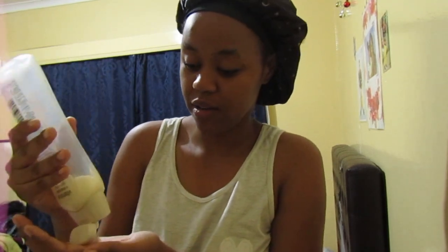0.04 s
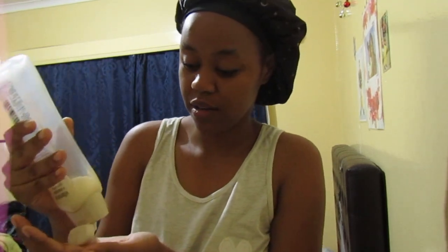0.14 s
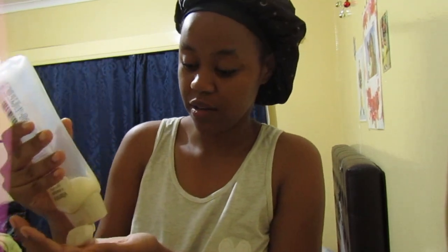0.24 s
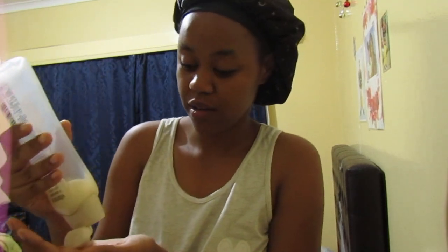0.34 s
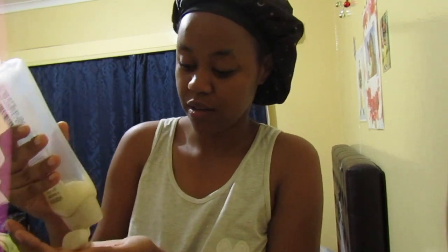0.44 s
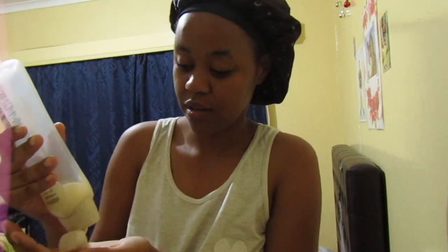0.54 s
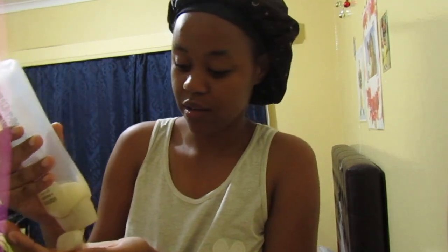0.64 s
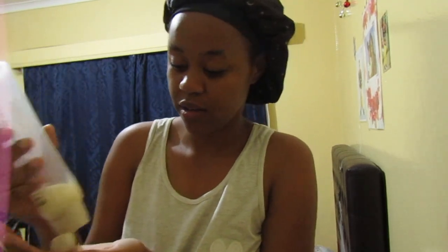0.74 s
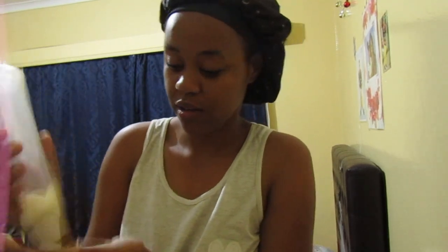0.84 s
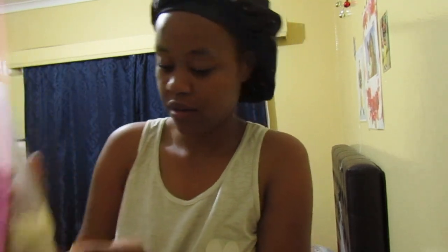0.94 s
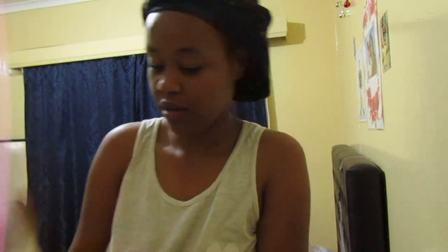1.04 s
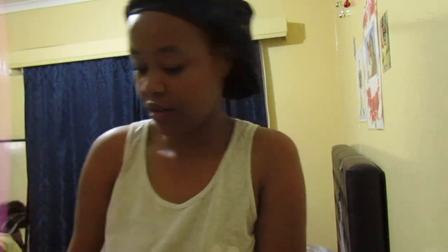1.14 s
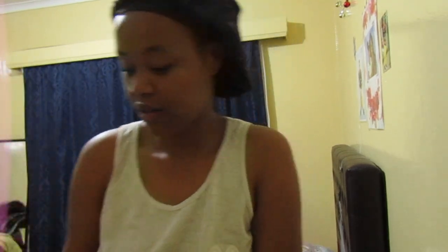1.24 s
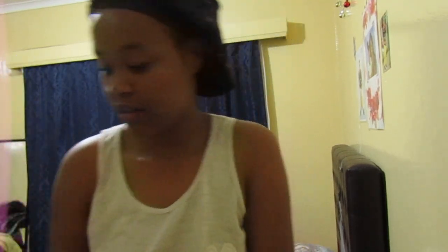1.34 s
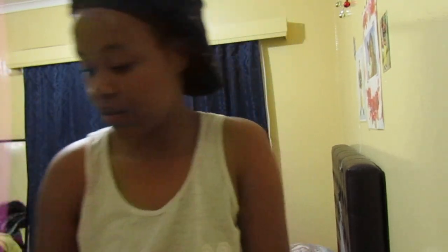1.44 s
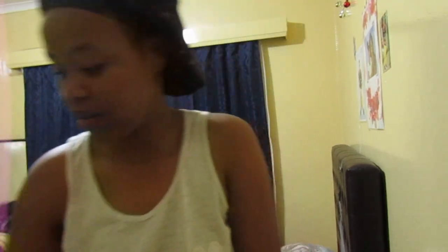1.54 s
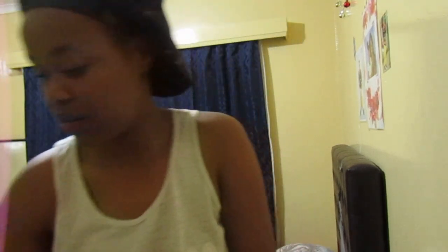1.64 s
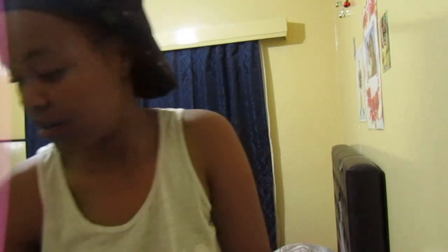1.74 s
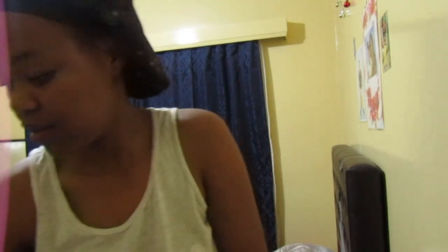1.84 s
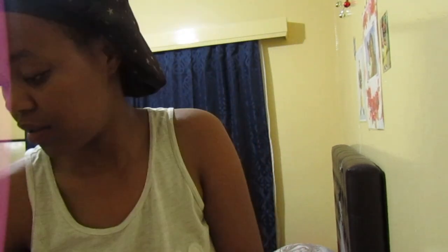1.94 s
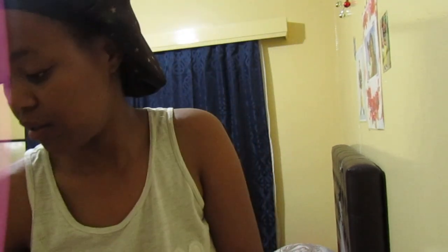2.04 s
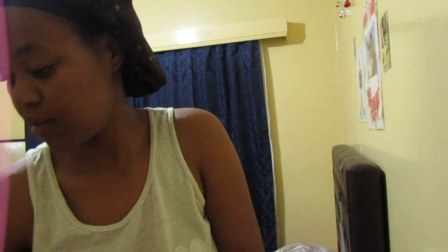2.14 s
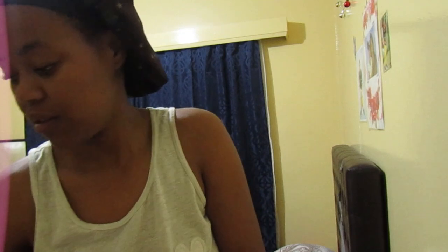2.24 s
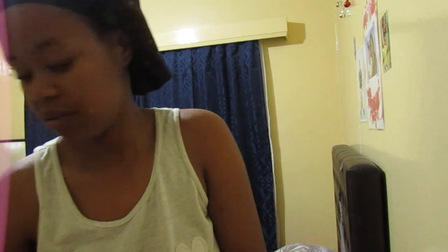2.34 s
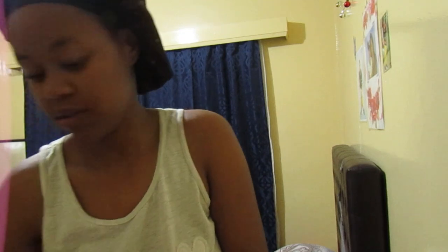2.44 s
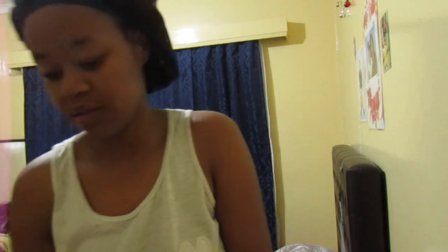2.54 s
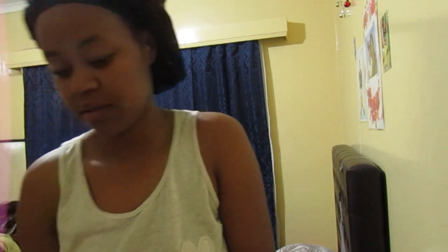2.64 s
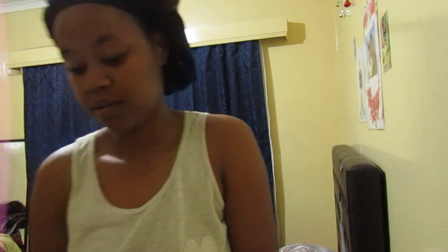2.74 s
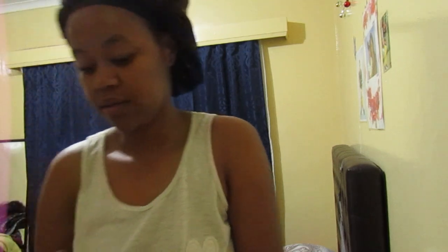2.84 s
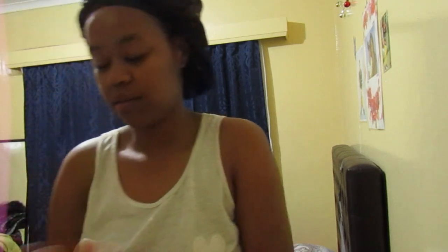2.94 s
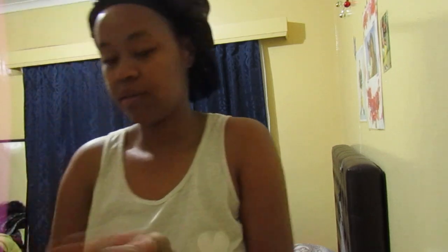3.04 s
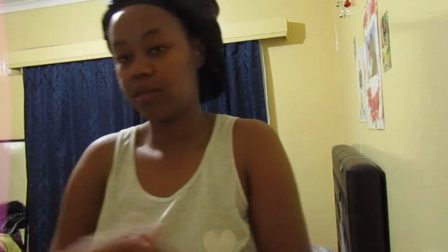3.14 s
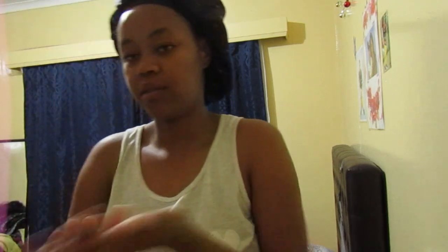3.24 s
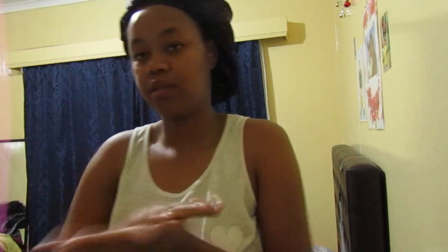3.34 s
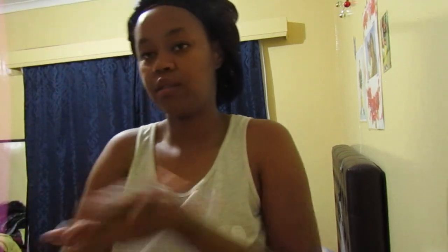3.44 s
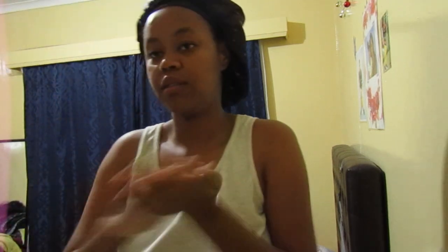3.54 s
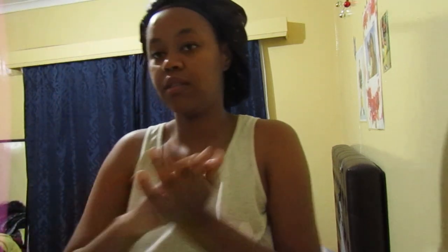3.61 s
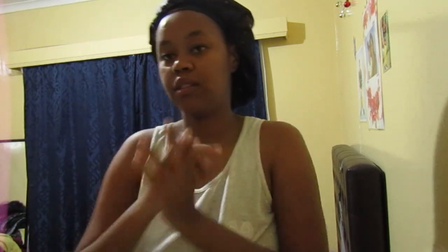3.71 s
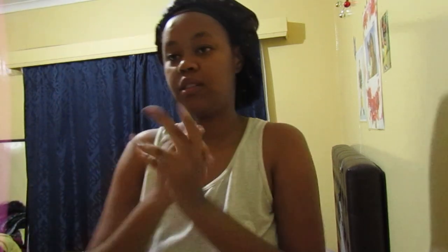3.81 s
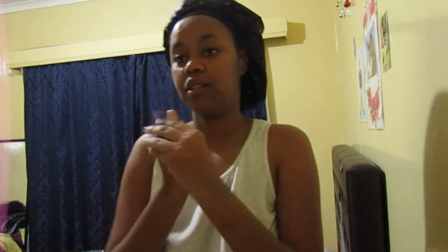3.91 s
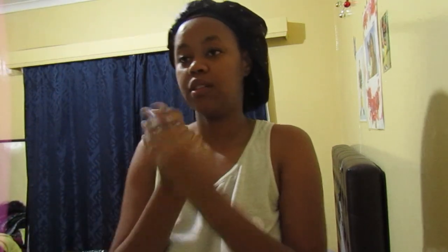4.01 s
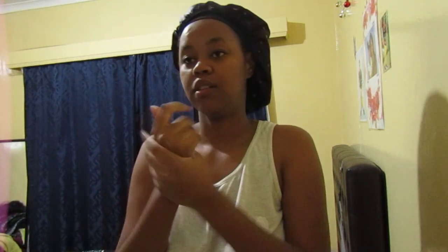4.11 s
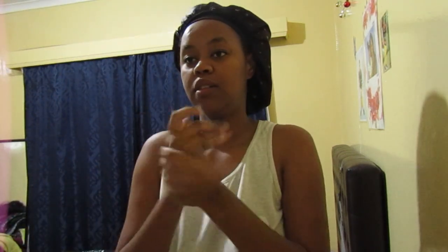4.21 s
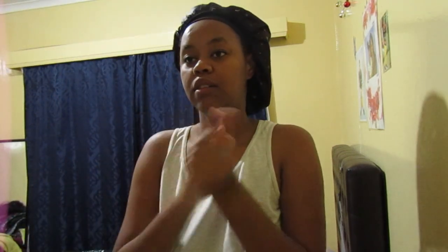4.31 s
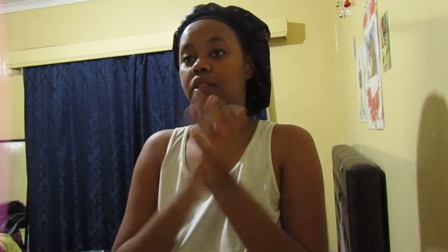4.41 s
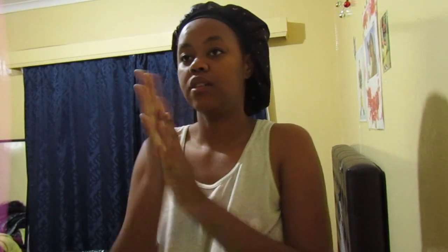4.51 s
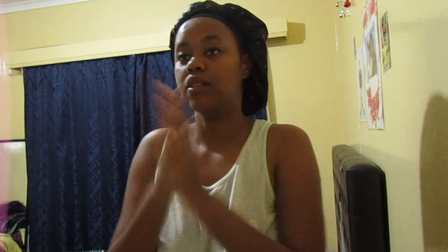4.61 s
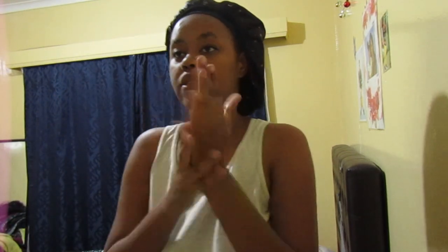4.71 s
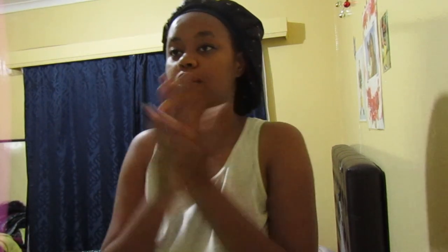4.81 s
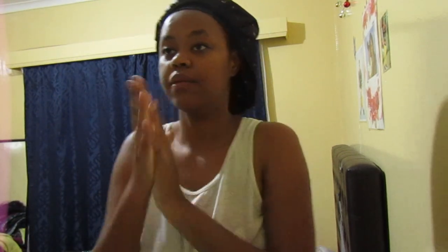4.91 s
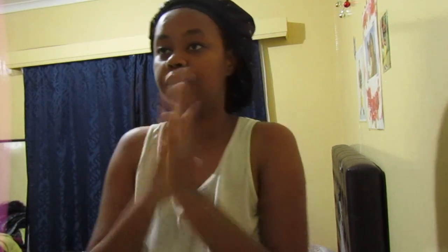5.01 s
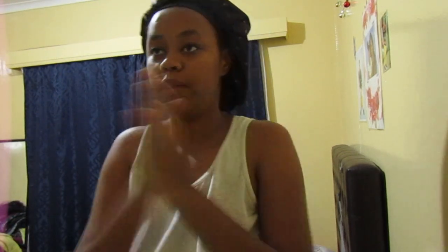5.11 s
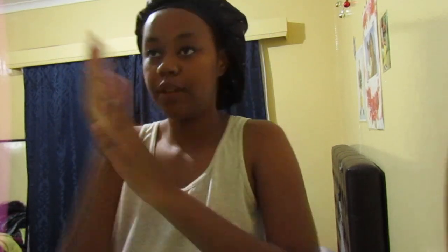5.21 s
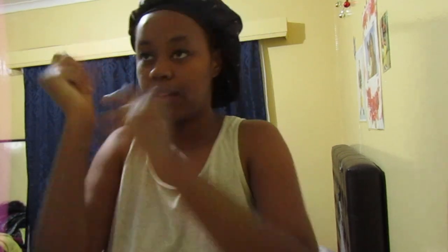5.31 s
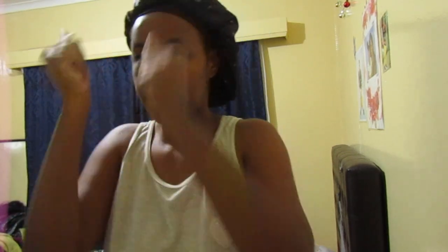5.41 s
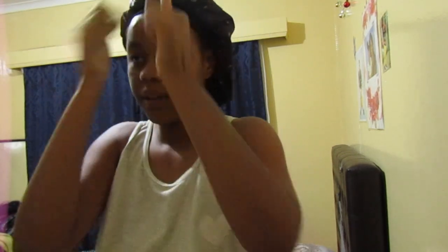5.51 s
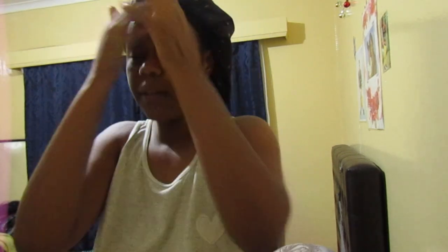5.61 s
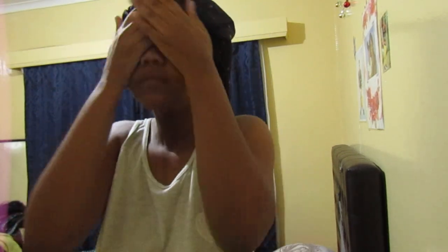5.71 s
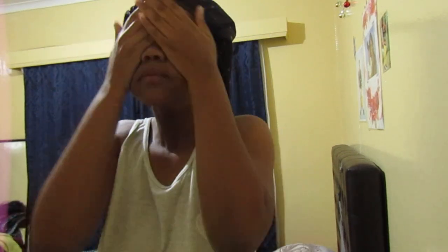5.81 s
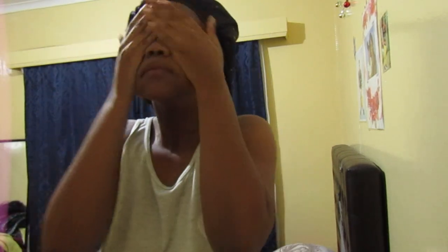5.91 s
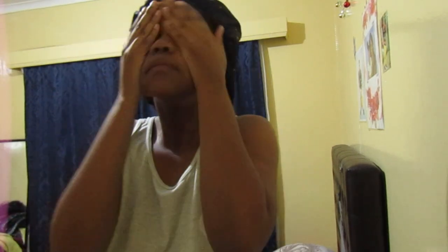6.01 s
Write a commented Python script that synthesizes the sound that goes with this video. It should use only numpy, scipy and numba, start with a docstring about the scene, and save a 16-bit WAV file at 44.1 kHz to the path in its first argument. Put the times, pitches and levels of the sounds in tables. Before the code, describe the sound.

In a quiet little bedroom, a close microphone catches a lotion bottle flexing and its plastic cap clicking closed. The bottle is set down with a hard, hollow knock, the loudest sound, ringing briefly in the room. Soft, low pats of hands follow, turning into sticky rubbing and then a series of dry, swishing palm strokes. Faint electrical hum, hiss and a thin whine lie underneath.

```python
"""A small quiet bedroom; mains hum and a faint camera whine run throughout. A plastic lotion bottle
flexes, sticky skin ticks, the cap snaps shut and fingers slip on the wall. The bottle bumps once, then
thuds hard on a table and the room's low modes ring on; the camera's limiter ducks and recovers.
The palms pat the lotion, rub it in with small squelches, then slide in separate hissing strokes."""
import sys
import numpy as np
from scipy import signal
from scipy.fft import rfft, irfft
from scipy.io import wavfile
from scipy.ndimage import uniform_filter1d
from numba import njit

SR = 44100
rng = np.random.default_rng(int(sys.argv[2]) if len(sys.argv) > 2 else 0)


def unload_wav(signal):
    """Save mono or channel-first audio to the path in sys.argv[1] as 16-bit WAV at rate SR, clipped to [-1, 1]."""
    wavfile.write(
        sys.argv[1],
        SR,
        np.round(np.clip(np.atleast_2d(signal).T, -1, 1) * 32767).astype(np.int16),
    )


N = 267246

# tick spectrum of latch and wet skin: (frequency [Hz], gain [dB])
TICK_SPECTRUM = [(100, -4.5), (400, 1), (1000, -2.5), (3000, -8), (5000, -8.5), (7500, -10.5), (11000, -10),
                 (15000, -25)]
# friction of pressed palms spreading lotion: (time [s], level [dB])
SPREAD_FRICTION = [(2.884, -68), (2.892, -51.5), (3.1, -48), (3.52, -51), (3.66, -55), (3.76, -76)]


def undb(db):
    """Decibels to gain."""
    return 10 ** (np.asarray(db) / 20)


def unit(x):
    """Scale to rms 1."""
    return x / np.sqrt(np.mean(x ** 2))


def clock():
    """Sample times [s]."""
    return np.arange(N) / SR


def curve(points):
    """Interpolate (time [s], value) points at every sample."""
    return np.interp(clock(), *np.transpose(points))


def over_hz(hz, points):
    """Interpolate (frequency [Hz], value) points on a log axis."""
    f, value = np.transpose(points)
    return np.interp(np.log(hz + 1), np.log(f), value)


def colour(x, points, size=8192):
    """Minimum-phase filter through (frequency [Hz], gain [dB]) points."""
    gain_db = over_hz(np.arange(size // 2 + 1) * SR / size, points)
    cepstrum = irfft(gain_db * np.log(10) / 20)
    cepstrum[1:size // 2] *= 2
    cepstrum[size // 2 + 1:] = 0
    return signal.fftconvolve(x, irfft(np.exp(rfft(cepstrum))))[:len(x)]


def walk(rate_hz):
    """Slewed random steps, rms 1."""
    hold = int(SR / rate_hz)
    steps = np.repeat(rng.standard_normal(N // hold + 1), hold)
    return unit(uniform_filter1d(steps, hold)[:N])


@njit
def resonate(x, hz, width_hz):
    """State-variable band-pass with a moving centre."""
    y, band, low = np.empty(len(x)), 0., 0.
    for i in range(len(x)):
        g, k = np.tan(np.pi * hz[i] / SR), width_hz / hz[i]
        v = (band + g * (x[i] - low)) / (1 + g * (g + k))
        band, low, y[i] = 2 * v - band, low + 2 * g * v, k * v
    return y


def burst(decay_s, spectrum):
    """Many tiny contacts: decaying coloured noise."""
    t = clock()[:SR // 2]
    return colour(rng.standard_normal(len(t)) * np.exp(-t / decay_s), spectrum)


def strike(modes, contact_s, low_hz):
    """Modes rung by a brief push; a small body radiates little below low_hz."""
    t = clock()[:SR // 2]
    ring = sum(undb(db - 60 * t / t60) * np.cos(2 * np.pi * hz * t) for hz, db, t60 in modes)
    push = t * np.exp(-np.pi * t / contact_s)
    highpass = signal.butter(2, low_hz, "high", fs=SR, output="sos")
    return signal.sosfilt(highpass, signal.fftconvolve(ring, push)[:len(t)])


def detuned(modes, scatter):
    """Modes shifted slightly by the changing grip."""
    shifts = np.exp(scatter * rng.standard_normal(len(modes)))
    return [(hz * shift, db, t60) for (hz, db, t60), shift in zip(modes, shifts)]


def add(track, s, sound, db, size=256):
    """Mix in a sound at time s; db sets the rms of its first size samples."""
    start = max(int(s * SR), 0)
    part = sound[:N - start] * undb(db) / np.sqrt(np.mean(sound[:size] ** 2))
    track[start:start + len(part)] += part


def room(x, wet_db, gap_s=0.0038):
    """Direct sound plus the diffuse tail of a small furnished room."""
    # room decay: (frequency [Hz], t60 [s])
    decay = [(200, 0.31), (1200, 0.29), (4500, 0.24), (12000, 0.19)]
    t = clock()[:SR // 2]
    hz, _, cells = signal.stft(rng.standard_normal(len(t)), SR)
    age_s = np.linspace(0, t[-1], cells.shape[1])
    fade = undb(-60 * age_s / over_hz(hz, decay)[:, None])
    tail = signal.istft(cells * fade, SR)[1][:len(t)] * (t > gap_s)
    return x + undb(wet_db) * signal.fftconvolve(x, tail / np.linalg.norm(tail))[:N]


def background(air_db=-52):
    """Room air, camera hiss, mains hum and a thin whine, all wavering slightly."""
    # air and hiss: (frequency [Hz], gain [dB])
    spectrum = [(12, -51), (20, -23), (49, -9), (70, -3.5), (87, -14), (128, -3.5), (164, -12), (211, -16),
                (278, -15), (310, -16.5), (656, -21), (1050, -21), (1880, -28), (12000, -39),
                (15000, -45.5)]
    # mains hum and camera whine: (frequency [Hz], level [dB])
    tones = [(60, -60), (122, -64.5), (215.3, -66), (11795, -78)]
    air = unit(colour(rng.standard_normal(N), spectrum)) * undb(air_db + 0.65 * walk(12))
    hum = sum(undb(db) * unit(np.sin(2 * np.pi * hz * clock() + 0.26 * walk(1.98))) for hz, db in tones)
    return air + hum


def bottle_flexes():
    """The squeezed plastic wall flexes in short bursts."""
    # flexes: (time [s], level [dB], decay [s])
    flexes = [(0.002, -57.5, .03), (0.318, -51, 0.014), (0.711, -54, 0.022), (0.722, -51, 0.012),
              (0.733, -44.5, 0.0075)]
    # flexing wall: (frequency [Hz], gain [dB])
    spectrum = [(150, -14), (500, -3.5), (800, -5), (1200, 2), (1900, -6.5), (2800, -7), (4000, -24),
                (11000, -15.5), (15000, -34)]
    out = np.zeros(N)
    for s, db, decay_s in flexes:
        add(out, s, burst(decay_s, spectrum), db)
    return out


def sticky_ticks():
    """Lotion ticks as skin parts."""
    # ticks: (time [s], level [dB], decay [s])
    ticks = [(0.515, -53, 0.003), (1.148, -51.5, .008), (2.298, -47.5, 0.0074), (2.89, -49.5, 0.029),
             (3.339, -61, 0.011), (5.345, -51, .003), (5.8968, -42, 0.0039)]
    out = np.zeros(N)
    for s, db, decay_s in ticks:
        add(out, s, burst(decay_s, TICK_SPECTRUM), db)
    return out


def cap_snap():
    """The latch ticks and rings the hollow plastic, then seats with a second click."""
    # latch contacts: (time [s], level [dB], relative tick level [dB], contact [s])
    snaps = [(0.863, -33, -3, 0.000094), (0.8652, -18.5, -20, 0.00018), (0.871, -37, -3.5, 0.000099),
             (0.8850, -39.5, -3, 0.00016), (0.9105, -24, -17.5, 0.000078), (0.9113, -33.5, -2, 0.00044),
             (0.916, -36, -4.5, 0.00018)]
    # cap and wall modes: (frequency [Hz], gain [dB], t60 [s])
    modes = [(392, -17, 0.032), (634, -11.5, 0.046), (1107, -6, 0.099), (1346, -1.5, 0.031),
             (1210, -9, 0.015), (1540, -5, 0.013), (2700, 5.5, 0.0057), (3680, 8, 0.013),
             (3860, 4.5, 0.013), (4250, -4.5, 0.0069), (4650, 7, 0.013), (5190, -2.5, 0.023)]
    out = np.zeros(N)
    for s, db, tick_db, contact_s in snaps:
        add(out, s, strike(detuned(modes, scatter=0.017), contact_s, low_hz=260), db)
        add(out, s + 0.00059, burst(0.0016, TICK_SPECTRUM), db + tick_db)
    return room(out, wet_db=-3)


def finger_slip(start_s=1.067, peak_s=1.147, end_s=1.197, edge_db=-65.5, peak_db=-49):
    """Fingers slip on the bottle: a brief swell of friction."""
    # skin on plastic: (frequency [Hz], gain [dB])
    spectrum = [(1500, -14), (2700, -4), (3800, -8), (5200, 2.5), (7500, 3), (9500, -5), (12000, -6),
                (15000, -16)]
    t = clock()
    swell_db = curve([(start_s, edge_db), (peak_s, peak_db), (end_s, edge_db)])
    hiss = unit(colour(rng.standard_normal(N), spectrum))
    return hiss * undb(swell_db + 2.6 * walk(200)) * (t > start_s) * (t < end_s)


def bottle_bump(time_s=1.457, level_db=-39.5, decay_s=0.006):
    """The carried bottle bumps dully on its way to the table."""
    # dull bump: (frequency [Hz], gain [dB])
    spectrum = [(80, -28), (190, 2), (320, -6.5), (480, -4.5), (800, -27), (2000, -31), (8000, -52.5)]
    out = np.zeros(N)
    add(out, time_s, burst(decay_s, spectrum), level_db, size=512)
    return room(out, wet_db=-10)


def bottle_landing(scrape_db=-4, wall_db=-6):
    """Edge, then base, thud on the table; each cracks, scrapes and rings bottle wall and room modes."""
    # contacts: (time [s], thud [dB], crack [dB])
    contacts = [(1.814, 3, -10.5), (1.8205, -25.5, -22)]
    # table thud and the room's low ringing modes: (frequency [Hz], gain [dB], t60 [s])
    thud_and_room_modes = [(289, -1, 0.042), (348, -16, 0.07), (212.2, -6.5, 0.15), (327, -9.5, 0.13),
                           (303.4, -11, 0.2), (395, -21.5, 0.24), (490, -18, 0.24), (592, -13.5, 0.099),
                           (786, -14, .15), (1026, -22, .09), (1170, -18.5, 0.092), (1330, -36.5, 0.084),
                           (1560, -7.5, .07), (92.5, -25, 0.38)]
    # hollow bottle modes: (frequency [Hz], gain [dB], t60 [s])
    wall_modes = [(605, -6.5, 0.04), (1000, 1.5, .05), (1180, 4, 0.039), (1320, 5.5, .09),
                  (1480, 0.5, 0.054)]
    # crack and scrape: (frequency [Hz], gain [dB])
    spectrum = [(100, -38), (500, 2), (1200, 4), (1900, -1.5), (2300, -8.5), (2800, -0.5), (3700, -2.5),
                (4500, -11.5), (5600, -8), (8000, -13.5), (11000, -16), (15000, -33)]
    thud, crack, scrape = np.zeros((3, N))
    click = colour(signal.unit_impulse(SR // 2), spectrum)
    for s, thud_db, crack_db in contacts:
        add(thud, s, strike(thud_and_room_modes, contact_s=0.0018, low_hz=191), thud_db)
        add(thud, s, strike(wall_modes, contact_s=0.00031, low_hz=400), crack_db + wall_db)
        add(crack, s + 0.001, click, crack_db)
        add(scrape, s, burst(0.004, spectrum), crack_db + scrape_db)
    return room(thud, wet_db=-15.5, gap_s=0.024) + room(crack, wet_db=-4.5) + scrape


def hand_pats(palm_lag_s=0.00936, palm_db=-2):
    """Fingers land, then the palm; soft flesh pushes slowly, so only low modes answer."""
    # pats: (time [s], level [dB], contact [s])
    pats = [(2.318, -33.5, 0.0054), (2.564, -38, 0.0012), (2.775, -36, 0.0024), (2.904, -37, 0.0026),
            (2.956, -41, 0.0055), (3.064, -43, .0025), (3.220, -40, 0.0013), (3.337, -42, 0.0023),
            (3.408, -45, 0.0031), (3.549, -47, 0.0074), (3.708, -48, 0.00074), (3.894, -48, 0.0029)]
    # low modes of hands and room: (frequency [Hz], gain [dB], t60 [s])
    boom = [(135, -5, 0.13), (204, 2, 0.15), (247, 4, 0.042), (297.5, 1, 0.083), (320, -2, 0.074),
            (507, -5.5, 0.06)]
    out = np.zeros(N)
    for s, db, contact_s in pats:
        modes = detuned(boom, scatter=0.043)
        lag_s = palm_lag_s * np.exp(0.083 * rng.standard_normal())
        add(out, s, strike(modes, contact_s, low_hz=119), db)
        add(out, s + lag_s, strike(modes, 2 * contact_s, low_hz=119), db + palm_db)
    return room(out, wet_db=-4.5)


def hand_motion(speed_exponent=1.77, rest_hz=2900, fall_oct=0.32, graze_s=(3.7, 5.4), graze_db=-65):
    """Friction gain and pitch of the palms' hollow, which opens and drops over each stroke."""
    # palm strokes: (start [s], length [s], peak [dB], share spent speeding up [0-1], hollow [Hz])
    strokes = [(2.916, 0.12, -50.5, 0.25, 2700), (3.02, .15, -51, .5, 2750), (3.141, 0.12, -47, 0.4, 3070),
               (3.289, 0.091, -45, 0.68, 3270), (3.395, .13, -47, 0.4, 3050),
               (3.503, 0.13, -51.5, 0.51, 2900), (3.84, .15, -55, .27, 3140),
               (3.908, 0.23, -56.5, 0.48, 2680), (4.12, 0.11, -58.5, .55, 2750),
               (4.25, .17, -52.5, 0.43, 2470), (4.396, .2, -48, 0.49, 2850), (4.579, 0.2, -47, .17, 3230),
               (4.752, 0.26, -53.5, .3, 3200), (4.93, 0.19, -44, .36, 3100), (5.088, 0.22, -44, 0.33, 2800),
               (5.43, .18, -62, .35, 2200)]
    t = clock()
    pressed = (t > SPREAD_FRICTION[0][0]) * (t < SPREAD_FRICTION[-1][0])
    spreading = undb(curve(SPREAD_FRICTION)) * pressed
    grazing = undb(graze_db) * (t > graze_s[0]) * (t < graze_s[1])
    power = spreading ** 2 + grazing ** 2 + 1e-18
    weighted_hz = power * rest_hz
    for start_s, length_s, db, rise, hz in strokes:
        progress = np.interp(t, start_s + length_s * np.array([0, rise, 1]), [0, 0.5, 1])
        speed = np.abs(np.sin(np.pi * progress))
        stroke_power = (undb(db) * speed ** speed_exponent) ** 2
        power += stroke_power
        weighted_hz += stroke_power * hz * 2 ** (fall_oct * (0.5 - progress))
    return np.sqrt(power), weighted_hz / power


def palm_rubbing(grain_db=2, flutter_db=1.3, hollow_width_hz=560.0, opening_db=5, rumble_db=-8.5):
    """Skin ridges slip; the moving hollow and finger gaps colour the hiss, and pressed hands rumble."""
    # skin friction: (frequency [Hz], gain [dB])
    skin_spectrum = [(300, -24), (900, -11), (1500, -4), (2100, -2.5), (2800, -5.5), (4000, -1.5),
                     (5300, 0.5), (7000, -1), (9000, -3.5), (11500, -5.5), (13500, -10.5), (15000, -16.5)]
    # finger gaps that open and close: (centre [Hz], width [Hz], gain [dB])
    finger_gaps = [(1910, 100, -10), (2840, 220, 2), (3880, 300, -23), (4860, 210, -17)]
    # pressed hands: (frequency [Hz], gain [dB])
    rumble_spectrum = [(80, -19), (200, 0), (310, 2.5), (450, -13.5), (900, -24), (3000, -53)]
    friction, hollow_hz = hand_motion()
    slips = rng.standard_normal(N) * undb(grain_db * walk(2500))
    hiss = colour(slips, skin_spectrum)
    hollow = resonate(hiss, hollow_hz * np.exp(0.087 * walk(25)), hollow_width_hz)
    gaps = np.zeros(N)
    for hz, width_hz, db in finger_gaps:
        opening = undb(db - opening_db + opening_db * walk(16))
        gaps += opening * resonate(hiss, hz * np.exp(0.1 * walk(8.4)), float(width_hz))
    rumble = unit(colour(rng.standard_normal(N), rumble_spectrum))
    rumble *= undb(curve(SPREAD_FRICTION) + rumble_db)
    sliding = unit(hiss + hollow + gaps) * friction * undb(flutter_db * walk(70))
    return room(sliding + rumble, wet_db=-15)


def lotion_squelches(stage_width_hz=250.0, fall_oct_per_s=1.0):
    """A wet gap rings briefly and sinks in pitch as it widens."""
    # squelches: (midpoint [s], length [s], centre [Hz], level [dB])
    squelches = [(2.9, 0.052, 1360, -52), (2.97, 0.053, 3980, -53), (3.009, 0.22, 2640, -55.5),
                 (3.214, 0.075, 3950, -55), (3.325, 0.049, 3230, -50), (3.616, .06, 1950, -53.5),
                 (5.047, 0.085, 2780, -53.5), (5.167, .08, 2930, -49), (5.199, 0.11, 2100, -52.5)]
    out = np.zeros(N)
    for mid_s, length_s, centre_hz, db in squelches:
        count = int(length_s * SR)
        hz = centre_hz * 2 ** (fall_oct_per_s * np.linspace(length_s / 2, -length_s / 2, count))
        noise = rng.standard_normal(SR // 2)[:count]
        ring = resonate(resonate(noise, hz, stage_width_hz), hz, stage_width_hz)
        start = int((mid_s - length_s / 2) * SR)
        out[start:start + count] += undb(db) * unit(ring) * np.hanning(count)
    return room(out, wet_db=-6)


def scene():
    """All sources at one microphone."""
    cap = cap_snap()
    handling = room(finger_slip() + bottle_flexes() + sticky_ticks(), wet_db=-3.5)
    knocks = bottle_bump() + bottle_landing()
    hands = hand_pats() + palm_rubbing() + lotion_squelches()
    return (cap + handling + knocks + hands + background())[None]


@njit
def follow(x, attack_s, release_s):
    """Peak envelope follower."""
    out, level = np.empty(len(x)), 0.
    for i in range(len(x)):
        lag_s = attack_s if abs(x[i]) > level else release_s
        level += (abs(x[i]) - level) / (SR * lag_s)
        out[i] = level
    return out


def record(dry, threshold_db=-2, attack_s=0.00065, release_s=0.79, notch_hz=7900, top_hz=15000):
    """Camera: a look-ahead limiter ducks at the knock and recovers slowly; clip, notch, low-pass."""
    gain = 1 / np.maximum(1, follow(dry[0], attack_s, release_s) / undb(threshold_db))
    early_gain = np.roll(gain, -SR // 1000)  # 1 ms ahead
    limited = np.clip(dry * early_gain, -1, 1)
    notched = signal.lfilter(*signal.iirnotch(notch_hz, Q=35, fs=SR), limited)
    return signal.sosfilt(signal.ellip(10, 0.2, 90, top_hz, fs=SR, output="sos"), notched)


dry = scene()
out = record(dry)
unload_wav(out)
```